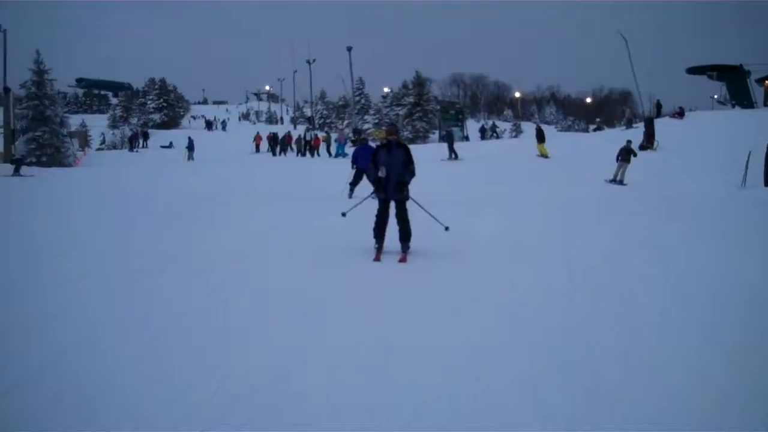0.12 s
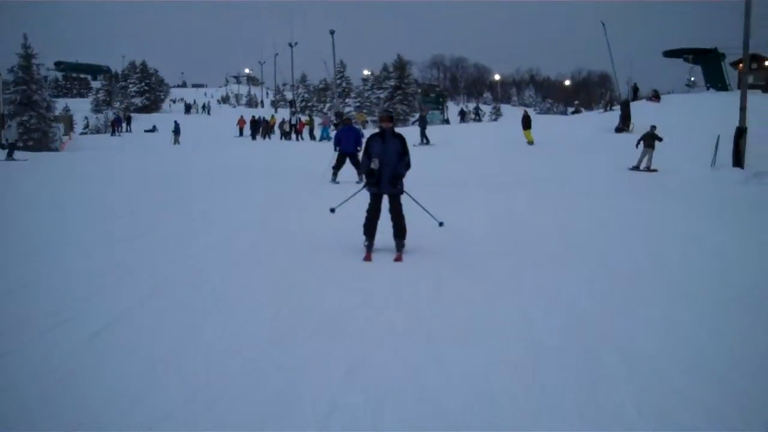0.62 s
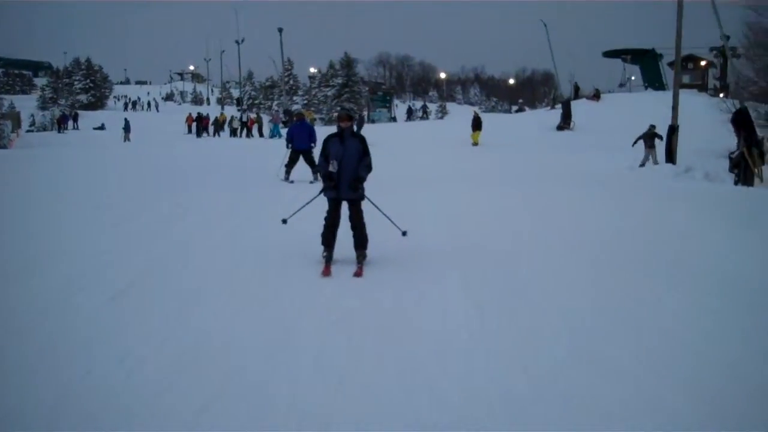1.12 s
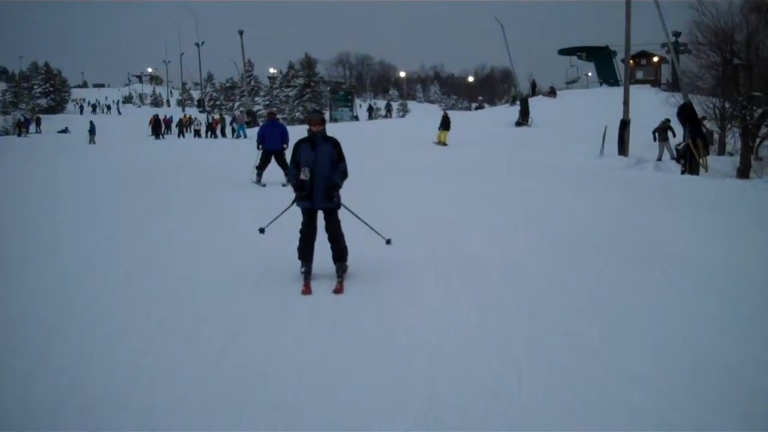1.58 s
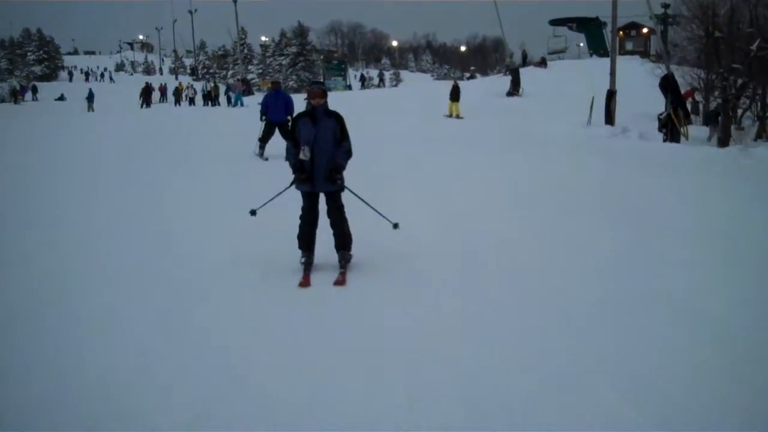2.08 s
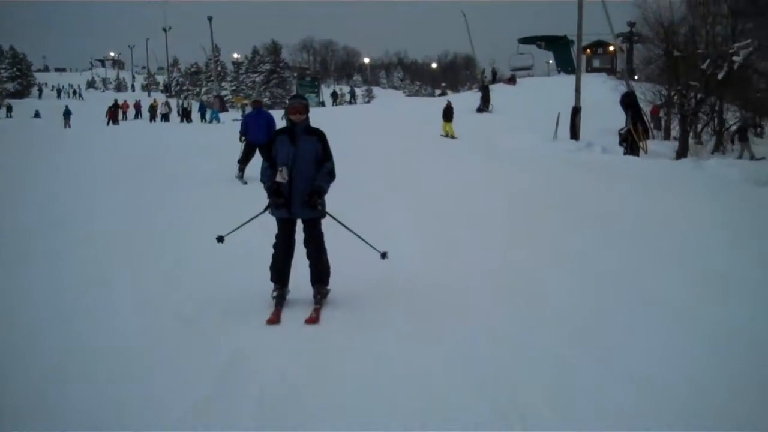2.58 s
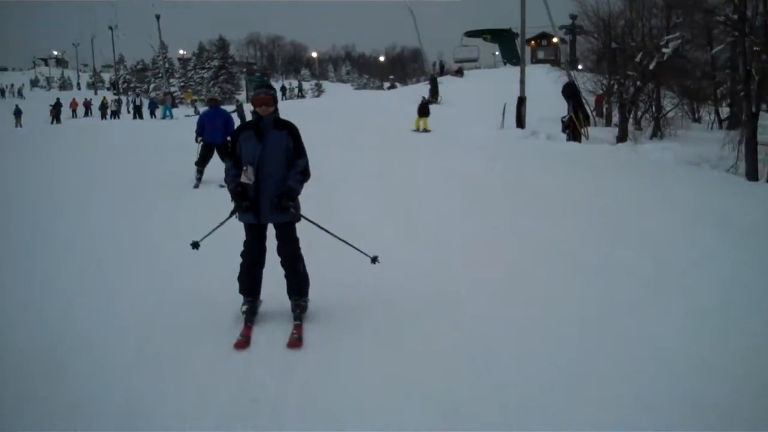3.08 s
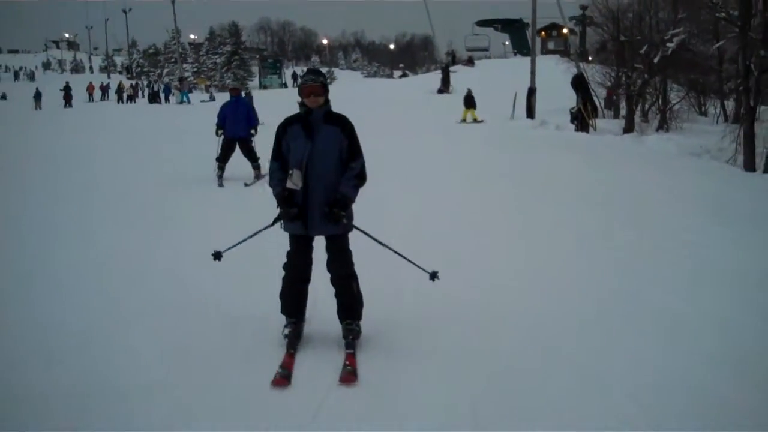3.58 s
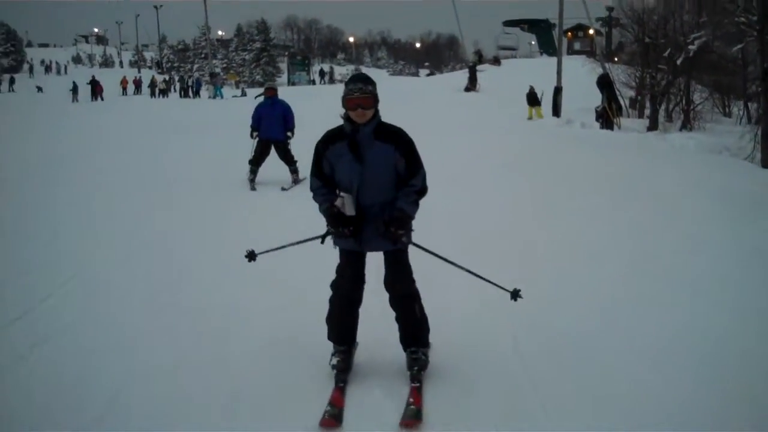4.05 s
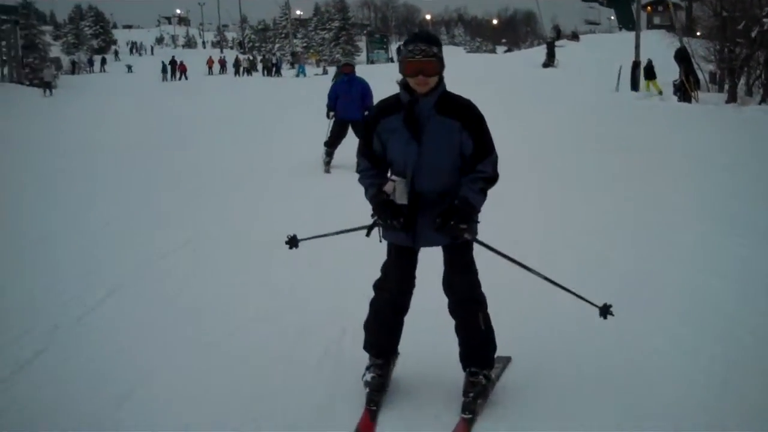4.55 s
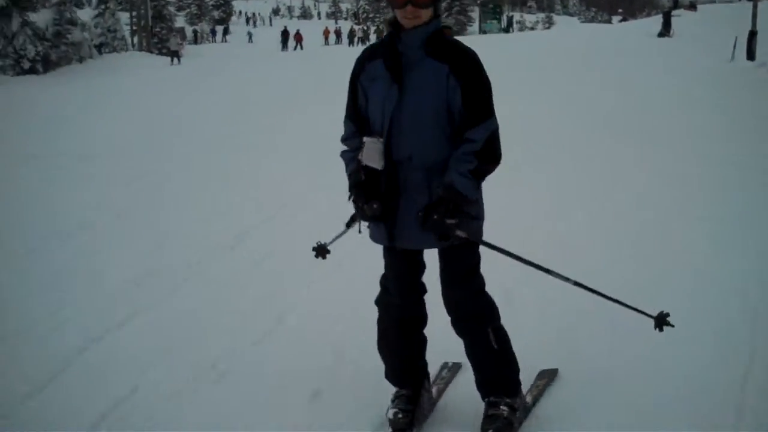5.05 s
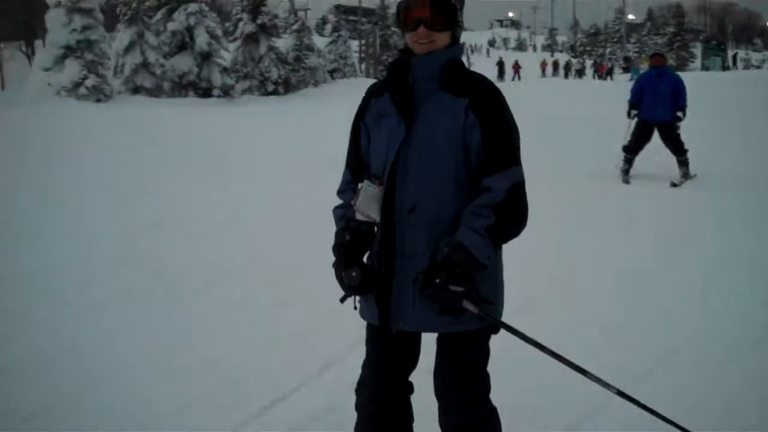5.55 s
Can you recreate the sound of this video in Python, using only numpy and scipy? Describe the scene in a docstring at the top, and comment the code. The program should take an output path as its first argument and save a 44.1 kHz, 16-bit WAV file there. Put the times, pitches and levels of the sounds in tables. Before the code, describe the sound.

A loud click as a handheld recorder starts, then skis hiss and scrape softly over packed snow with dull handling knocks and tiny ice ticks.

```python
"""A dull, thin opening with a jump in the input offset, then a button snapping back as a limiter ducks the mix:
a recorder has just been switched on. Skis then glide over packed snow near its two microphone ports.
Patchy noise and clumps of tiny cracks make the hiss, band-limited noise the drone, short pings the ice crust.
Low noise makes the wind, slips of noise the glove, pulses with a short ring the grip, decaying sines the button.
A skier draws near with a grittier scrape; resonances of the housing colour snow, crust and glove."""
import sys
import numpy as np
from scipy import signal
from scipy.fft import rfft, irfft, next_fast_len
from scipy.io import wavfile
from scipy.ndimage import uniform_filter1d, minimum_filter1d, map_coordinates

SR = 44100
rng = np.random.default_rng(int(sys.argv[2]) if len(sys.argv) > 2 else 0)


def voltage_ratio(decibels):
    """Convert decibels (scalar or array-like) to amplitude ratios, 20 dB per decade."""
    exponent = np.asarray(decibels, float) / 20
    return 10 ** exponent


def to_wav(sig):
    """Store sig (one row per channel, or 1-D mono) as 16-bit WAV at the path in sys.argv[1].

    Samples outside -1..1 are clipped; the rate is SR.
    """
    pcm = np.clip(np.atleast_2d(sig), -1, 1) * 32767
    pcm = np.round(pcm).astype(np.int16)
    wavfile.write(sys.argv[1], SR, pcm.T)  # frames by channels


N = 249725

# hiss and base drone of the skis on the snow: t/s, hiss level/dB, drone level/dB
GLIDE_LEVELS = [(0.2, -48, -57), (0.6, -49.5, -58.5), (0.8, -48, -62.5), (1.0, -47, -56),
                (1.24, -47.5, -57.5), (1.33, -46, -50.5), (1.6, -47, -56.5), (1.9, -47.5, -59),
                (2.38, -48, -60), (2.52, -50.5, -63.5), (2.76, -44.5, -57), (2.9, -48, -57.5),
                (3.45, -47.5, -59), (3.8, -45.5, -55.5), (4.0, -47.5, -59), (4.06, -45.5, -51.5),
                (4.17, -44.5, -52.5), (4.45, -45, -54), (4.85, -44, -54), (5.25, -45, -60),
                (5.43, -44, -60.5), (5.66, -45, -60)]
# housing resonances in front of each port: f/Hz, nominal width/Hz, level/dB
LEFT_RESONANCES = [(438, 95, -5), (758, 97, -3.5), (1213, 266, -3), (1860, 780, -11), (2458, 196, -1.5),
                   (2980, 366, -2), (3966, 585, -2.5), (4990, 410, -6.5), (5760, 510, -10.5),
                   (7580, 770, -15), (9200, 1540, -17.5), (11230, 2900, -23)]
RIGHT_RESONANCES = [(363, 38, -6), (748, 106, -3), (1208, 147, -1), (1856, 750, -10.5), (2500, 340, -6.5),
                    (4260, 830, -11.5), (5310, 490, -8.5), (6215, 440, -9.5), (7240, 530, -16),
                    (8600, 800, -28)]
# likeness of the two ports: f/Hz, share of the power common to both (0 to 1)
PORT_LIKENESS = [(100, 0.69), (400, 1), (770, 0.83), (920, 0.26), (1200, 1), (1700, 0.9), (2000, 0.65),
                 (2250, 0.51), (2550, 0.75), (2850, 0.24), (3400, 0.83), (4300, 0.64), (6100, 0.75),
                 (6550, 0.17), (7450, 0.41), (8500, 0.22), (14000, .2)]
# phase between the ports: f/Hz, lead of the left port/rad
LEFT_LEAD = [(1050, 0), (1650, -1.6), (2050, 0), (2750, 2.8), (3300, 1), (3700, 2.5), (4500, 3),
             (4800, 5.1), (5300, 5.2), (5700, 6.1), (6350, 5.9), (7500, 7.8), (9000, 5)]
# spectrum of the wind on the ports: f/Hz, relative level/dB
WIND_SPECTRUM = [(15, 1.5), (40, -4), (100, -9), (300, -18), (600, -16), (900, -42)]
# spectrum of the recorder's self noise: f/Hz, relative level/dB
SELF_NOISE_SPECTRUM = [(200, 10), (3000, -1), (10000, 4), (12300, 5), (13200, 6.5), (14200, 6)]
# shifts of the grip on the housing: t/s, thud level/dB, ring level/dB
GRIP_BUMPS = [(0.31, -58, -39.5), (0.341, -53, -38), (0.43, -49, -50), (0.494, -59, -35), (0.537, -56, -35),
              (0.562, -66, -41.5), (0.585, -64, -43.5), (0.609, -58, -45), (0.643, -67, -39.5),
              (0.715, -54, -47), (0.736, -44.5, -42), (0.901, -68, -50), (0.924, -47, -57),
              (1.029, -45, -37.5), (1.263, -52, -65), (1.78, -49, -46), (1.861, -44, -56.5),
              (1.925, -45.5, -52), (2.015, -48.5, -55), (2.047, -48, -50), (2.222, -52.5, -73),
              (2.412, -41.5, -46), (2.445, -49, -64), (2.86, -59, -50.5), (2.963, -46, -70),
              (3.017, -47, -57), (3.113, -52.5, -73), (3.221, -47, -49), (3.277, -42, -45),
              (3.361, -47.5, -54), (3.783, -40, -44), (3.794, -56, -39), (3.858, -50, -57),
              (3.877, -48, -45.5), (3.936, -51, -58), (4.027, -41.5, -51.5), (4.259, -39.5, -45.5),
              (4.308, -48, -59), (4.361, -53, -46), (4.462, -39.5, -47), (4.476, -50, -41),
              (5.321, -56, -42), (5.385, -45, -52)]
# ice crust cracking under an edge: t/s, level ahead of the ports/dB, ping f/Hz, snap level against ping/dB
CRUST_TICKS = [(0.922, -28, 5900, 3), (1.0457, -21, 4060, -1), (1.2764, -18, 4140, 4),
               (1.6087, -32, 6500, 5), (2.368, -26, 4930, 8), (2.7514, -27, 3090, 6),
               (2.7761, -22, 3800, 7), (2.8579, -30, 3870, 7), (4.36, -23, 3900, 9),
               (4.555, -26.5, 4100, 8), (5.3762, -31, 5360, 5)]
# contacts as the button snaps back and rattles: t/s, left level/dB, right level/dB
BUTTON_CONTACTS = [(0.1177, -2.5, -1), (0.1183, -2.5, -2), (0.1195, -4, -20), (0.1223, -7, -11)]
# modes of the shell that the button rings: f/Hz, level/dB, t60/s
SHELL_MODES = [(220, -15, 0.022), (467, -6.5, 0.038), (870, -5.5, 0.015), (1137, -7.5, 0.024),
               (1570, -16.5, 0.0054), (2590, -8.5, 0.013), (3020, -14, 0.0049), (4370, -12, 0.0041),
               (7600, -1.5, 0.005)]
# strength of the wind: t/s, level/dB
WIND_LEVELS = [(0.17, -47), (0.4, -53.5), (0.75, -56.5), (1.0, -61.5), (1.9, -60), (2.7, -64.5),
               (4.1, -59.5), (5.0, -67.5), (5.35, -59), (5.66, -63)]
# edges of the skier who draws near: t/s, level/dB
NEARING_LEVELS = [(4.3, -70), (4.55, -53), (5, -55), (5.25, -51), (5.36, -47), (5.42, -42.5), (5.58, -47),
                  (5.66, -50)]
# glove rubbing the housing: start of the hold t/s, hold/s, level/dB
GLOVE_RUBS = [(0.04, 0.007, -48.5), (0.157, 0.0079, -44), (0.264, 0.48, -60.5), (3.795, 0.0093, -60),
              (3.86, 0.025, -63), (4.305, .01, -62), (4.467, 0.0091, -60), (5.338, .03, -67)]


def unit(x):
    """Scaled to rms 1."""
    return x / np.sqrt(np.mean(x ** 2) + 1e-20)


def along(points, hz):
    """Reads (f/Hz, value) points on a log frequency axis."""
    f, v = np.transpose(points)
    return np.interp(np.log(hz + 1), np.log(f + 1), v)


def curves(rows):
    """One value per sample for each column after the time."""
    s, *columns = np.transpose(rows)
    return [np.interp(np.arange(N) / SR, s, column) for column in columns]


def wobble(rate):
    """A smooth random curve, rate knots a second."""
    knots = rng.standard_normal(int(N * rate / SR) + 4)
    return map_coordinates(knots, [np.arange(N) * rate / SR])


def filtered(x, response):
    """x times a complex response of frequency."""
    m = next_fast_len(N + SR // 2)
    return irfft(rfft(x, m) * response(np.fft.rfftfreq(m, 1 / SR)), m)[..., :N]


def above(hz, edge_hz):
    """Gain of a soft high-pass."""
    return 1 / np.sqrt(1 + (edge_hz / (hz + 1)) ** 6)


def below(hz, edge_hz):
    """Gain of the low-pass that complements it in power."""
    return np.sqrt(1 - above(hz, edge_hz) ** 2)


def port_gain(modes, hz):
    """Resonances of the housing, summed in power."""
    power = sum(voltage_ratio(2 * db) / (1 + (2 * (hz - centre) / width) ** 2) ** 1.344 for centre, width, db in modes)
    return np.sqrt(power)


def ports(hz):
    """Gain and phase of the two microphone ports, with the lead split evenly between them."""
    half_lead = np.exp(.5j * along(LEFT_LEAD, hz))
    return np.array([port_gain(LEFT_RESONANCES, hz) * half_lead, port_gain(RIGHT_RESONANCES, hz) / half_lead])


def likeness(hz):
    """Share of the power common to both ports."""
    return np.clip(along(PORT_LIKENESS, hz), 0, 1)


def heard(sources, colour):
    """A common source and one of each port's own, mixed by likeness, through the ports; rms 1."""
    common = filtered(sources[0], lambda hz: colour(hz) * ports(hz) * np.sqrt(likeness(hz)))
    own = filtered(sources[1:], lambda hz: colour(hz) * ports(hz) * np.sqrt(1 - likeness(hz)))
    return unit(common + own)


def patchy(patchy_db):
    """Three noises under one field of random gain patches in time and frequency."""
    z = signal.stft(rng.standard_normal((3, N)), nperseg=512)[2]
    field = uniform_filter1d(rng.standard_normal(z.shape[1:]), size=7, axis=0)
    field = uniform_filter1d(field, size=8, axis=1)
    return signal.istft(z * voltage_ratio(patchy_db * unit(field)), nperseg=512)[1][:, :N]


def self_noise():
    """Steady coloured noise of the recorder, separate in each channel."""
    noise = filtered(rng.standard_normal((2, N)), lambda hz: voltage_ratio(along(SELF_NOISE_SPECTRUM, hz)))
    return voltage_ratio(-63.5) * unit(noise)


def wind():
    """Lumpy low buffeting, mostly alike at both ports."""
    common, apart = filtered(rng.standard_normal((2, N)), lambda hz: voltage_ratio(along(WIND_SPECTRUM, hz)))
    lumps = voltage_ratio(2.6 * wobble(23) + 0.7 * wobble(3.9))
    buffeting = lumps * np.array([common + 0.48 * apart, common - 0.5 * apart])
    return voltage_ratio(curves(WIND_LEVELS)[0]) * unit(buffeting)


def rub():
    """Irregular slips of the glove excite the low housing resonances; each stroke rises, holds and fades."""
    rise_db_per_s, fall_db_per_s, rest_db = 400, 258, -74
    t = np.arange(N) / SR
    strokes = voltage_ratio(rest_db)
    for s, hold, db in GLOVE_RUBS:
        rise = rise_db_per_s * np.clip(s - t, 0, None)
        fall = fall_db_per_s * np.clip(t - s - hold, 0, None)
        strokes = strokes + voltage_ratio(db - rise - fall)
    slips = rng.standard_normal((3, N)) * voltage_ratio(3 * wobble(70))
    return strokes * heard(slips, lambda hz: 1 / (1 + (hz / 560) ** 6) + 8 / (1 + ((hz - 200) / 90) ** 2))


def faint_bumps():
    """Small shifts of the grip at chance moments, in the columns of GRIP_BUMPS."""
    count, thud_db, ring_db, spread_db = 22, -58, -56, 3
    moments = rng.uniform(.25, N / SR, count)
    return [(s, thud_db + spread_db * rng.normal(), ring_db + spread_db * rng.normal()) for s in moments]


def grip():
    """Each bump is one dull pull and push, a few cycles of the housing's lowest ring and a scuff."""
    scuff_db, scuff_t60_s = -17, .12  # low rough tail: level against the thud, decay
    x, t = np.zeros((2, N + SR)), np.arange(-600, 900) / SR
    rough = filtered(rng.standard_normal(N), lambda hz: hz / (90 + hz) / (1 + (hz / 350) ** 4))
    rough = unit(rough) * voltage_ratio(4.7 * wobble(60))
    late = np.clip(t + 0.0032, 0, None)  # the ring starts 3.2 ms ahead of the thud's centre
    ring_shape = late / 0.002 * np.exp(1 - late / 0.002)
    for s, thud_db, ring_db in list(GRIP_BUMPS) + faint_bumps():
        wide, pitch, turn = rng.standard_normal(3)
        # soft pushes are slower and ring less
        width_s = 0.00082 * np.exp(0.15 * wide + 0.041 * np.clip(thud_db - ring_db, 0, 20))
        u = t / width_s
        thud = 1.86 * voltage_ratio(thud_db) * u * np.exp(-u * u / 2)
        hz = np.array([[460], [410]]) * np.exp(.07 * pitch)  # left, right
        ring_gain = voltage_ratio(ring_db + np.array([[1.5], [-1.5]]))
        ring = ring_gain * ring_shape * np.sin(2 * np.pi * hz * t + 3 * turn)
        at = round(s * SR)
        x[:, at - 600:][:, :len(t)] += thud + ring
        tail = rough[at:][:SR // 8]
        fade_db = -60 * np.arange(len(tail)) / SR / scuff_t60_s
        x[:, at:][:, :len(tail)] += voltage_ratio(thud_db + scuff_db + fade_db) * tail
    return x[:, :N]


def button():
    """Every contact rings the shell, a little differently at each port, under a short crack."""
    x, t = np.zeros((2, N)), np.arange(SR // 10) / SR
    for s, *db in BUTTON_CONTACTS:
        ring = 0
        for hz, level, t60 in SHELL_MODES:
            decay = voltage_ratio(level + rng.normal(0, 1.5, (2, 1)) - 60 * t / t60)
            ring = ring + decay * np.sin(2 * np.pi * hz * t + rng.normal(0, .35, (2, 1)))
        crack = .5 * voltage_ratio(-60 * t / 0.01) * rng.standard_normal((2, len(t)))
        x[:, round(s * SR):][:, :len(t)] += voltage_ratio(np.array(db))[:, None] * (ring + crack)
    # high-pass at 110 Hz, low-pass at 8 kHz
    return filtered(x, lambda hz: (1j * hz / (110 + 1j * hz)) ** 2 / (1 + 1j * hz / 8000) ** 4)


def nearing():
    """Close edges scrape in a narrower, grittier band."""
    grit = patchy(1.7) * voltage_ratio(2.5 * wobble(120))
    return voltage_ratio(curves(NEARING_LEVELS)[0]) * heard(grit, lambda hz: 1 / (1 + ((hz - 4150) / 800) ** 2))


def crust():
    """Single sharp cracks: a short ping on a broad snap, coloured by the ports."""
    x, t = np.zeros(N + SR), np.arange(300) / SR
    for s, db, hz, snap_db in CRUST_TICKS:
        ping = voltage_ratio(-60 * t / 0.0049) * np.sin(2 * np.pi * hz * t)
        snap = voltage_ratio(snap_db - 60 * t / 0.0018) * rng.choice([-1, 1], len(t))
        x[round(s * SR):][:len(t)] += voltage_ratio(db) * (ping + snap)
    return filtered(x[:N], lambda hz: ports(hz) * np.clip(hz / 2500, 0, 2))


def crystal_cracks():
    """Crystals break in clumps of tiny cracks: single-sample clicks of random size and sign."""
    chance, size = rng.random((2, 3, N))
    rate_per_s = 1300 * voltage_ratio(2.5 * wobble(30))
    size_db = np.minimum(-4 * np.log(size + 1e-9), 14)
    return (chance < rate_per_s / SR) * voltage_ratio(size_db) * rng.choice([-1, 1], (3, N))


def skis():
    """The bases drone and hiss on the snow, with crystal cracks in the hiss."""
    hiss_db, drone_db = curves(GLIDE_LEVELS)
    # spray over scrape grows as the skis come closer
    bright_db = 0.5 + 1.58 * np.arange(N) / SR + 1.9 * wobble(5.05)
    crunch_db = -6 + 3 * wobble(7)  # cracks against the smooth hiss
    judder = wobble(7.3)  # ripples in the snow shake every layer
    drone = heard(patchy(2.97) * voltage_ratio(0.9 * wobble(45)), lambda hz: above(hz, 230) * below(hz, 2000))
    snow = unit(patchy(0.79)) + voltage_ratio(crunch_db) * unit(crystal_cracks())
    snow = snow / np.sqrt(1 + voltage_ratio(2 * crunch_db))  # the share of cracks leaves the power alone
    scrape = heard(snow, lambda hz: above(hz, 1370) * below(hz, 2560) + 0.59 * above(hz, 10700))
    spray = voltage_ratio(bright_db) * heard(snow, lambda hz: above(hz, 4360) * below(hz, 8250))
    hiss = (scrape + spray) / np.sqrt(1 + voltage_ratio(2 * bright_db))
    hiss_gain = voltage_ratio(hiss_db + 0.29 * judder + 0.44 * wobble(22))
    return voltage_ratio(drone_db + 0.62 * judder) * drone + hiss_gain * hiss


def scene():
    """All sources at the two ports."""
    return wind() + rub() + grip() + button() + nearing() + crust() + skis()


def limiter(x):
    """One gain for both channels falls at a peak above half scale and holds 43 ms."""
    need = np.minimum(1, .5 / (np.abs(x).max(axis=0) + 1e-9))
    held = minimum_filter1d(need, size=1901, origin=950)
    return x * uniform_filter1d(held, size=61, origin=30)


def switch_on(x):
    """The input opens wide, dull and thin, takes its first gain step and its offset settles."""
    wake_s, settle_s = .0372, .0598  # input opens, first gain step
    step, hold_s, sag_per_s = .27, .004, 6.9  # offset at switch-on (full scale 1), its hold and fall
    swing, swing_at_s, swing_s = -.028, .115, .19  # swing the other way, its peak time and width
    t = np.arange(N) / SR
    start = filtered(x, lambda hz: voltage_ratio(23) / np.sqrt((1 + (hz / 1200) ** 2) * (1 + (250 / (hz + 1)) ** 4)))
    sagging = step - sag_per_s * np.clip(t - wake_s - hold_s, 0, None)
    swinging = swing * np.exp(-((t - swing_at_s) / swing_s) ** 2)
    offset = np.where(t < settle_s, sagging, swinging) * [[1], [-1]]  # opposite in the two channels
    return (np.where(t < settle_s, start, x) + offset) * (t > wake_s)


def top_cut(x):
    """Nothing passes above the cut-off."""
    return signal.sosfilt(signal.butter(12, 16660, fs=SR, output="sos"), x)


def record(dry):
    """Self noise, the limiter, the switch-on of the input and a treble limit."""
    x = switch_on(limiter(dry + self_noise()))
    mix = filtered(x, lambda hz: np.where(hz < 14250, 1, voltage_ratio(-25)))
    return top_cut(mix)


dry = scene()
out = record(dry)
to_wav(out)
```